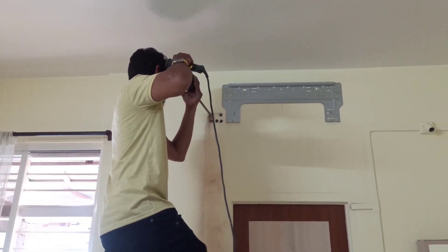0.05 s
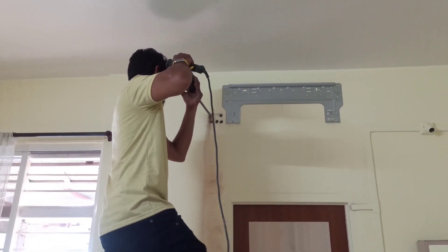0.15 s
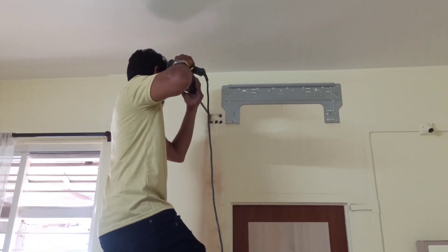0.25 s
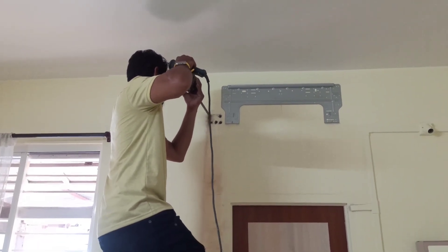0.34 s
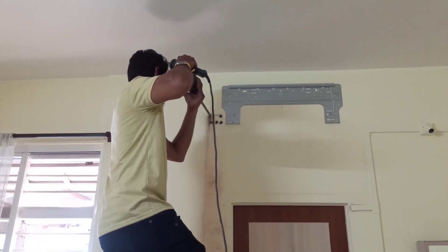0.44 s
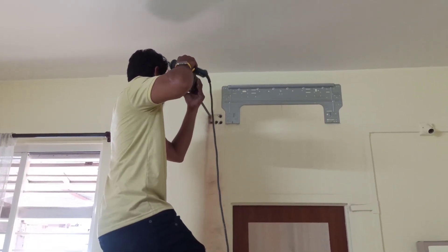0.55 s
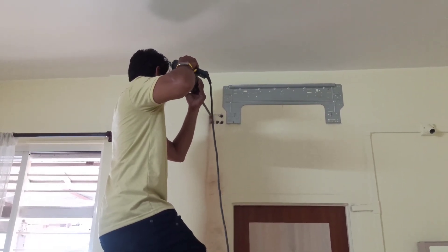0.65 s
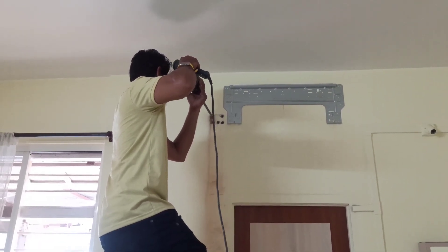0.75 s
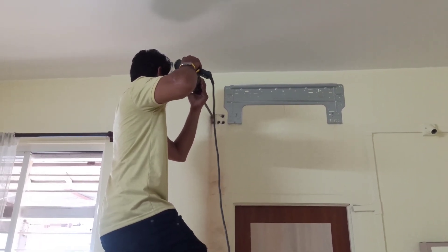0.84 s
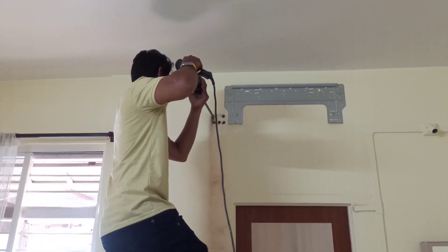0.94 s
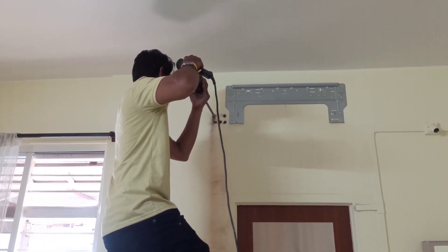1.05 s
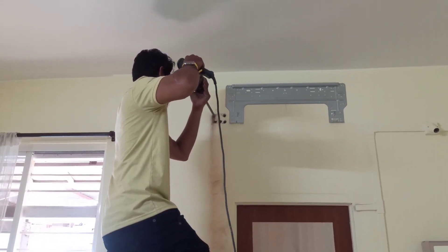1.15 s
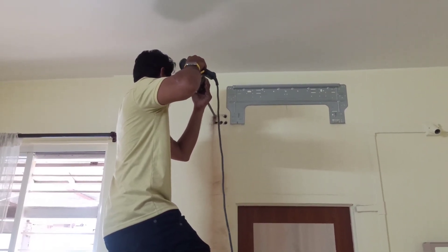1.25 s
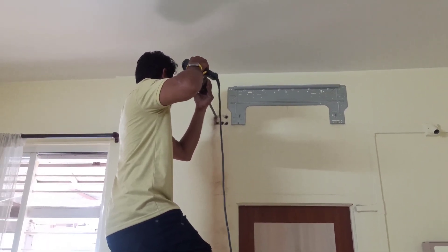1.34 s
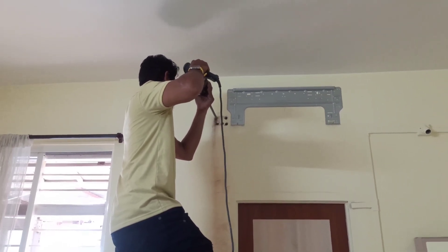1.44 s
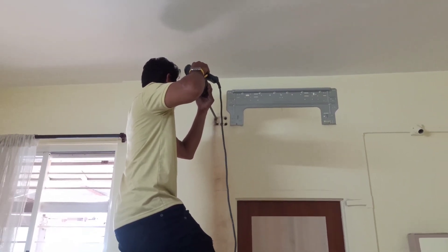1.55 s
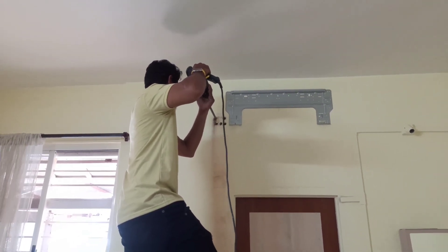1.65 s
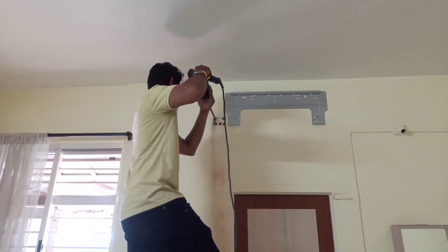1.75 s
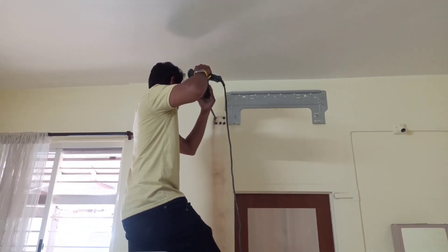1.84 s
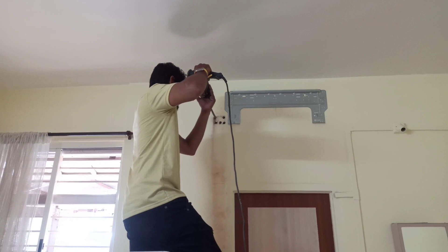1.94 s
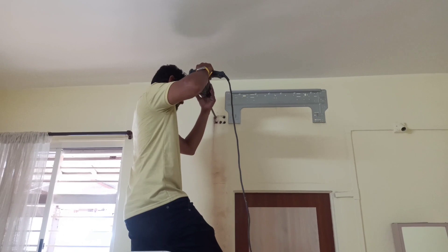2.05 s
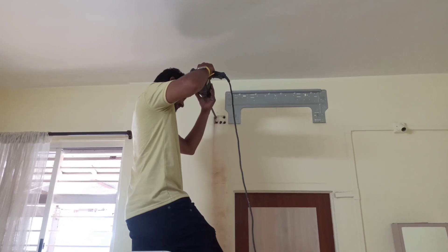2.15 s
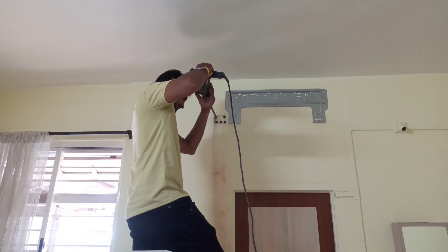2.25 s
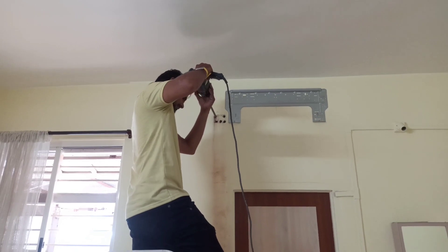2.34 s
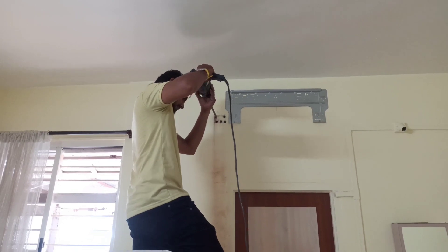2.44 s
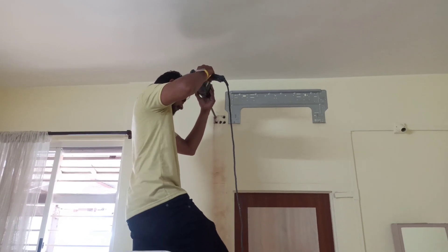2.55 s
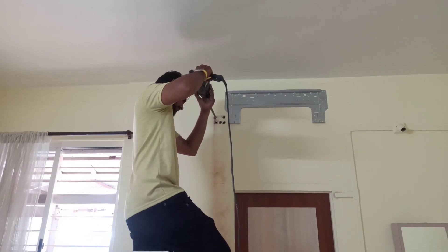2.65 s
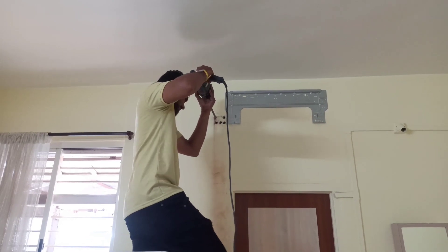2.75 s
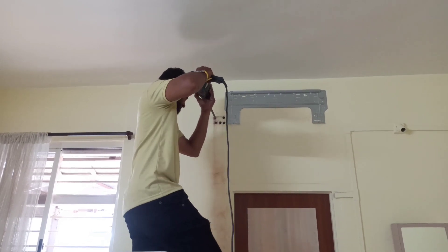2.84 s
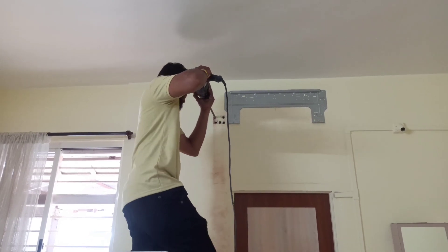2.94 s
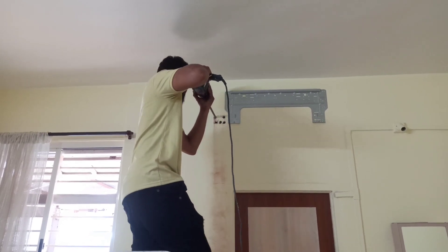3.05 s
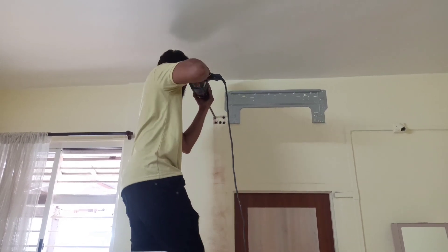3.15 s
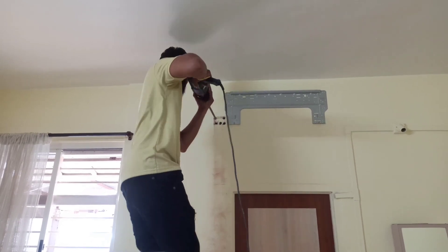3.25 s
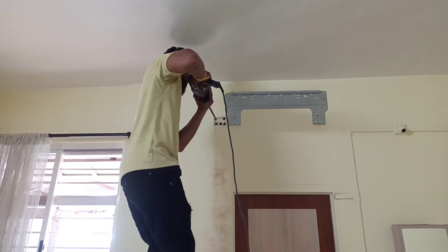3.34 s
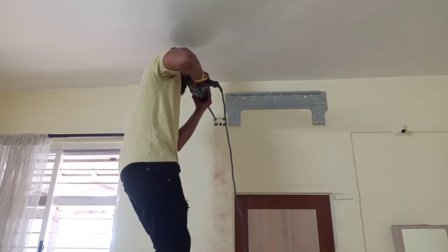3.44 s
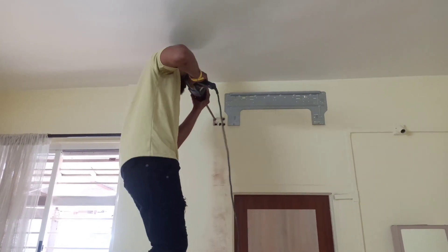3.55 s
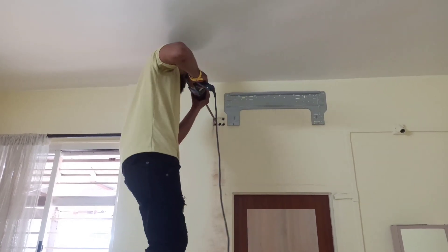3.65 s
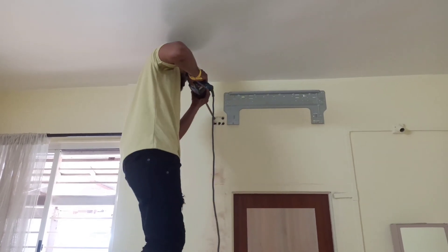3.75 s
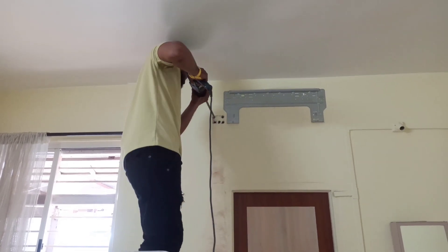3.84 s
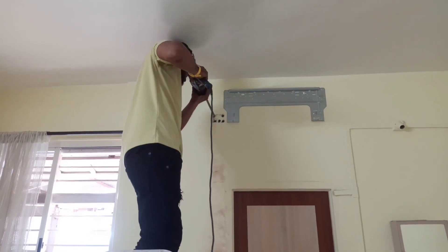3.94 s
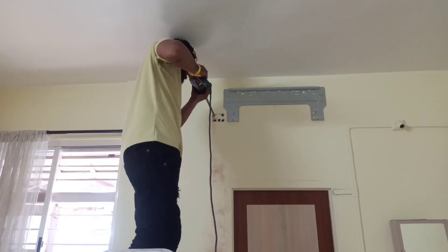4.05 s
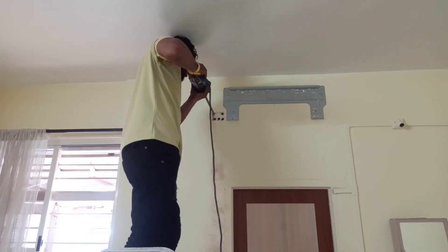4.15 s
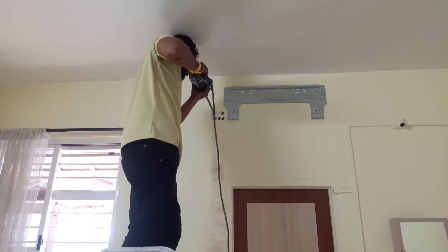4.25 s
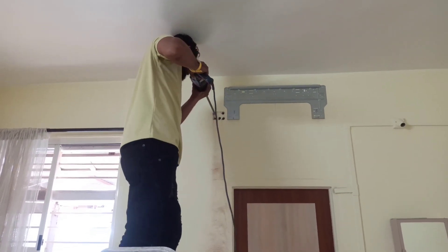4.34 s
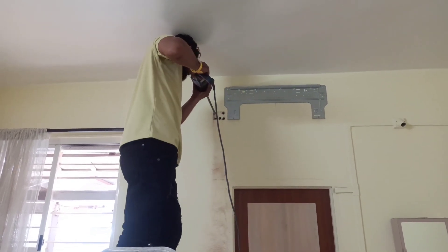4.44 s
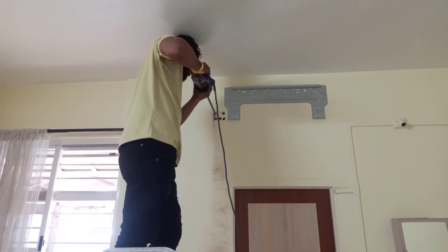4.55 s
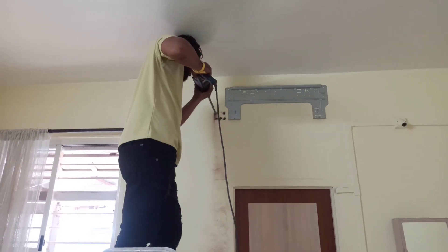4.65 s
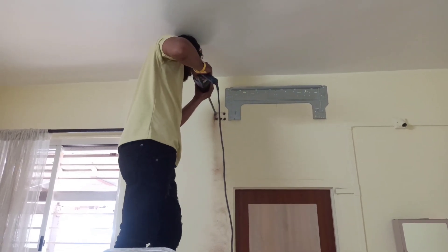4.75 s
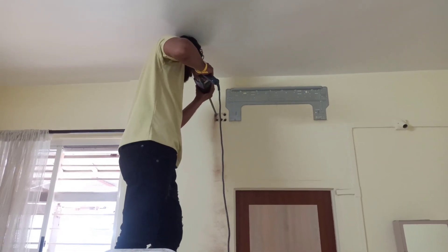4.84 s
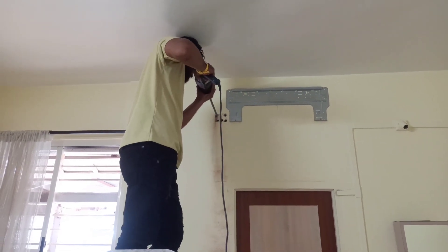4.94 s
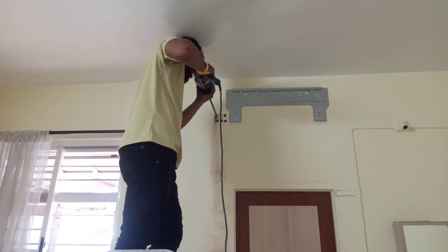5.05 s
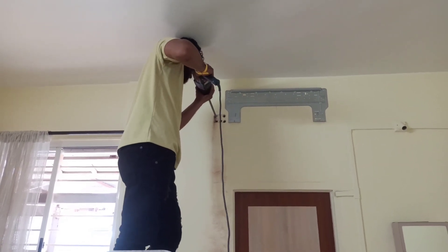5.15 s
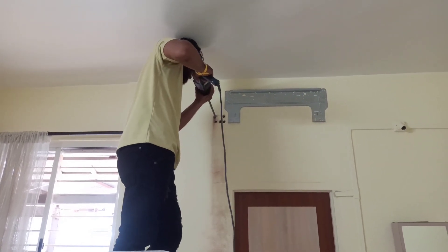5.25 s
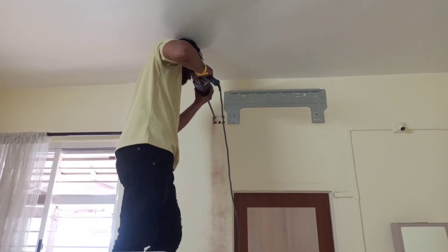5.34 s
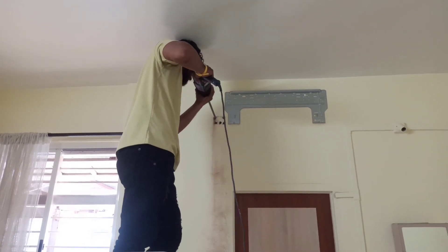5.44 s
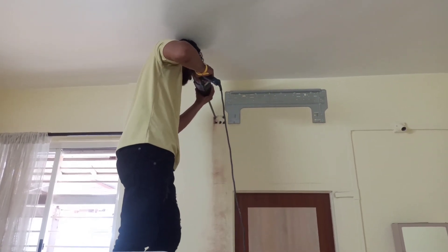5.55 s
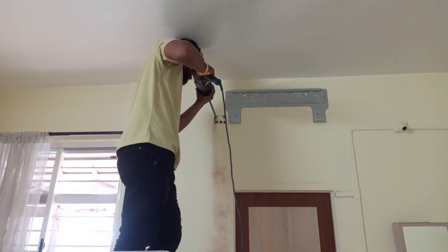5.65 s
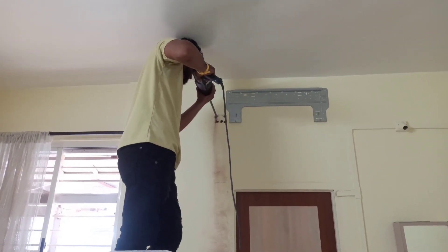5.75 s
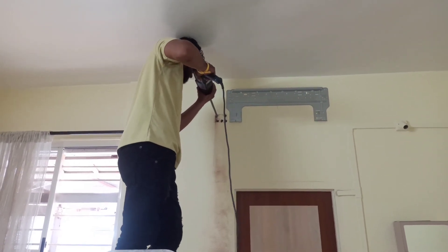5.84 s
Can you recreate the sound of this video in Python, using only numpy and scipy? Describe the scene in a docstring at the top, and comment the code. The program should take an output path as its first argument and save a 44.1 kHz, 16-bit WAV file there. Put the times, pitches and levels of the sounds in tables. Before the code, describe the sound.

An electric hammer drill is already boring loudly into a plastered brick wall, close to the microphone in a bare, echoing room. It makes a harsh, gritty grinding with a rapid buzzing pulse and a faint motor hum underneath. For the first 1.3 seconds the steel bit rings brightly over low thumping, with dull knocks near 0.2 and 0.7 seconds. The grinding then turns duller, with faint squeals as the bit binds. At about 3 seconds the drill cuts out, the loose bit chatters and the echo fades. At 3.3 seconds it restarts with a jolt. Bright ringing and a few more knocks return from 3.6 to 4.2 seconds, followed by duller grinding with thin, high squeals. From about 5.6 seconds the hard metallic hammering comes back, and the drill is still running at the end, just before 6 seconds.

```python
"""A rotary hammer drill grinding into a plastered brick wall: bare room, one small microphone close by.
The cutting edge scrapes through the dust; against hard brick each piston blow also rings the steel
and thumps the wall. Now and then the bit binds and squeals. Behind it, motor hum and faint room hiss.
About 3 s in the trigger is let go: the loose bit chatters, the room dies away, the motor starts again."""
import sys
import numpy as np
from scipy import signal
from scipy.fft import rfft, irfft, next_fast_len
from scipy.io import wavfile
from scipy.ndimage import uniform_filter1d, map_coordinates

SR = 44100
rng = np.random.default_rng(int(sys.argv[2]) if len(sys.argv) > 2 else 0)


def wav_record(signal):
    """Record a signal, one row per channel, as 16-bit PCM in the file named by sys.argv[1]."""
    frames = np.transpose(np.atleast_2d(signal))
    bounded = np.clip(frames, -1, 1)
    # unit amplitude maps onto the largest positive 16-bit level
    quanta = np.round(bounded * 32767).astype(np.int16)
    wavfile.write(sys.argv[1], SR, quanta)


N = 259749

# reverberation of the bare room: f/Hz, time to fall 60 dB/s
ROOM_DECAY = [(100, 0.64), (1000, 0.78), (4000, 1), (12000, 0.67)]
# armature hum at full drive: t/s, level/dB
HUM_LEVEL = [(0, -38), (.7, -46.5), (.95, -42), (1.4, -39), (1.6, -54), (2.05, -41.5), (2.6, -44.5),
             (2.95, -38.5), (3.5, -44), (3.7, -45), (4.5, -51), (4.9, -47), (5.5, -54), (5.7, -42),
             (5.89, -52)]
# the trigger is let go, the motor coasts, then runs again: t/s, level under full drive/dB
MOTOR_DRIVE = [(2.95, -0.5), (3.02, -2.5), (3.05, -6.5), (3.07, -2.5), (3.1, -10), (3.2, -28), (3.28, -45),
               (3.31, -24), (3.35, -0.5)]
# pace of the piston: t/s, blow rate/Hz
PISTON_RATE = [(0, 67.3), (.7, 68), (1.3, 66.8), (3.6, 68), (4.15, 67.2), (5.6, 72), (5.89, 69)]
# how firmly the blows reach the wall: t/s, level/dB
THUMP_LEVEL = [(0, -38), (.15, -40), (.23, -32.5), (.39, -42), (.54, -46), (.6, -34), (1.0, -35.5),
               (1.1, -38), (1.15, -30.5), (1.25, -42), (1.33, -53), (2.03, -49), (2.38, -67), (3.53, -54),
               (3.6, -46), (3.79, -32), (3.92, -40), (4.0, -37.5), (4.08, -33), (4.15, -49), (4.54, -56),
               (5.0, -69), (5.55, -66), (5.63, -35), (5.77, -41.5), (5.89, -51)]
# low end of the shaking wall: f/Hz, relative level/dB
THUMP_SPECTRUM = [(20, -15), (55, -26), (70, -2), (105, 0), (140, -2), (165, -5), (205, 2.5), (260, -4),
                  (350, -1.5), (500, -7), (1200, -21)]
# the hardest blows: t/s, peak level/dB
KNOCKS = [(.245, -24), (.655, -17), (3.755, -25), (3.8, -21), (4.05, -26), (4.091, -27)]
# the trigger closes, then the bit bites: t/s, level/dB
JOLT_LEVEL = [(3.314, -60), (3.319, -31), (3.338, -31), (3.348, -23), (3.385, -22), (3.42, -40)]
# the jolted tool body: f/Hz, width/Hz, relative level/dB
BODY_MODES = [(874, 44, 0), (1320, 78, 1), (1800, 43, -15), (2000, 83, -9), (2570, 54, -2)]
# chatter off the trigger: t/s, level/dB
CHATTER_LEVEL = [(3.045, -54), (3.055, -24.5), (3.095, -23.5), (3.2, -47), (3.3, -68)]
# the bit free in its hole: f/Hz, width/Hz, relative level/dB
LOOSE_BIT_MODES = [(920, 50, -9), (2760, 80, -15), (3330, 30, -8), (3590, 50, 3), (4490, 70, 2),
                   (6250, 70, 0), (6640, 70, -9), (7220, 50, 4), (8160, 60, -8)]
# squeals of the binding bit: start t/s, end t/s, f/Hz, width/Hz, level/dB
BINDS = [(1.305, 1.5, 890, 20, -40), (1.45, 1.8, 2510, 28, -36.5), (1.45, 1.8, 4330, 130, -31),
         (2.148, 2.445, 794, 18, -40), (2.8, 3.053, 744, 26, -35), (4.101, 4.45, 600, 33, -44),
         (4.3, 5.55, 4360, 160, -31), (4.35, 5.89, 1917, 130, -34), (4.852, 5.7, 855, 4, -41),
         (4.947, 5.3, 2565, 50, -37)]
# the brick under the bit: t/s, hardness/0-1
BRICK_HARDNESS = [(0, 0.98), (.36, .94), (.45, .7), (.54, .74), (.64, 0.86), (1.1, 0.85), (1.25, 0.84),
                  (1.33, 0.58), (1.41, 0.04), (2.3, 0.06), (2.72, 0.1), (2.9, 0), (3.36, 0.05), (3.53, 0),
                  (3.59, 0.5), (3.68, 0.93), (3.79, 0.91), (3.97, .77), (4.08, .92), (4.15, 0.77), (4.2, 0),
                  (5.13, 0.25), (5.53, 0.2), (5.6, .75), (5.71, 0.87), (5.81, 0.87), (5.89, 0.35)]
# wall and tool body: f/Hz, width/Hz, relative level/dB
WALL_MODES = [(368.6, 11, -6), (616, 27, -7), (756, 72, -3.5), (846, 18, -1.5), (901, 45, -3),
              (1298, 84, -3), (1895, 205, -1), (2358, 44, 1.5), (2560, 35, -2.5), (3575, 220, -4),
              (4070, 350, -1.5)]
# steel bit and chuck: f/Hz, width/Hz, relative level/dB
STEEL_MODES = [(3920, 130, -7.5), (6160, 360, -4), (7624, 87, 6.5), (9400, 310, 4), (11170, 290, 4.5),
               (13080, 285, 9), (14760, 290, 10)]
# how hard the bit is pushed in: t/s, level added to the grinding/dB
FEED_PUSH = [(0, -1), (.4, 0), (.5, -1), (1.3, -.5), (1.42, 0.5), (1.75, 0), (1.9, 0), (2.4, 1), (2.95, -1),
             (3.36, .5), (3.66, -.5), (3.9, 1), (4.0, -1), (4.15, 0), (4.8, 0), (5.0, -.5), (5.5, .5),
             (5.89, -0.5)]
# brick dust and cutting edge: f/Hz, relative level/dB
GRIT_SPECTRUM = [(40, -37), (120, -23.5), (300, -10), (700, -4), (1500, -5), (3000, -3.5), (4200, 0.5),
                 (7000, -1.5), (16000, -12.5)]
# the small microphone, its treble in shelves; all other levels are ahead of it: f/Hz, gain/dB
MIC_RESPONSE = [(20, 0.5), (4700, 2), (4850, -5.5), (6050, -9), (6170, 1.5), (7600, -1.5), (7700, -5.5),
                (8470, -5), (8570, -19.5), (10400, -22.5), (11530, -29), (11640, -3.5), (12550, -11),
                (12750, -9), (15500, -11.5)]


def amp(db):
    """Decibels to gain."""
    return 10 ** (np.asarray(db) / 20)


def unit(x):
    """Scaled to rms 1."""
    return x / np.sqrt(np.mean(x ** 2) + 1e-20)


def along(points, hz):
    """Rows of f/Hz, value, joined up on a log frequency axis."""
    f, values = np.transpose(points)
    return np.interp(np.log(hz + 1), np.log(f + 1), values)


def curve(rows, outside=None):
    """Rows of t/s, value, joined up to one value a sample."""
    times, values = np.transpose(rows)
    return np.interp(np.arange(N) / SR, times, values, left=outside, right=outside)


def wobble(rate):
    """A smooth random curve, rate knots a second."""
    return map_coordinates(rng.standard_normal(int(N * rate / SR) + 4), [np.arange(N) * rate / SR])


def filtered(x, response):
    """x through a complex frequency response."""
    size = next_fast_len(N + SR // 2)
    return irfft(rfft(x, size) * response(np.fft.rfftfreq(size, 1 / SR)), size)[:N]


def modes(table):
    """Response of a set of resonances, alternating in sign."""
    return lambda f: sum((-1) ** k * amp(db) * 1j * f * width / (hz * hz - f * f + 1j * f * width)
                         for k, (hz, width, db) in enumerate(table))


def patchy_noise(spread_db):
    """White noise with patches of random gain in time and frequency."""
    spectra = signal.stft(rng.standard_normal(N), nperseg=512)[2]
    patches = uniform_filter1d(rng.standard_normal(spectra.shape), 5, axis=0)
    patches = uniform_filter1d(patches, 8, axis=1)
    return signal.istft(spectra * amp(spread_db * unit(patches)), nperseg=512)[1][:N]


def room_hiss(level_db=-61):
    """The steady floor of the room, far behind the tool."""
    return amp(level_db) * rng.standard_normal(N)


def room_echo(x):
    """The bare room answers, each frequency dying at its own speed."""
    hz, t, spectra = signal.stft(rng.standard_normal(SR // 2), SR, nperseg=256)
    decay = amp(-60 * t / along(ROOM_DECAY, hz)[:, None])
    tail = signal.istft(spectra * decay, SR, nperseg=256)[1]
    return signal.fftconvolve(x, tail / np.linalg.norm(tail))[:N]


def motor_hum(shaft_hz=476):
    """The armature hums, one cycle a turn, a little unsteady."""
    turns = np.cumsum(shaft_hz + 4.98 * wobble(4) + 3 * wobble(30)) / SR
    level_db = curve(HUM_LEVEL) + curve(MOTOR_DRIVE) - .5 * wobble(7) + 3 * wobble(25)
    return amp(level_db) * np.sin(2 * np.pi * turns)


def wall_thump(blows, spread_s=.0121):
    """Each blow shakes the wall; its modes up to 400 Hz answer out of step, over spread_s."""
    def response(f):
        lag = np.pi * spread_s * np.minimum(f, 400) ** 2 / 400
        return amp(along(THUMP_SPECTRUM, f)) * np.exp(-1j * lag)
    rumble = amp(-3) * rng.standard_normal(N)  # the wall keeps shaking between blows
    return amp(curve(THUMP_LEVEL)) * unit(filtered(unit(blows) + rumble, response))


def wall_knocks(width_s=.0013):
    """The hardest blows each push the wall once: a short, dull pulse."""
    out = np.zeros(N)
    for at, db in KNOCKS:
        u = (np.arange(N) / SR - at) / width_s
        out -= amp(db) * (1 - u * u) * np.exp(-u * u / 2)
    return out


def restart_jolt():
    """The motor's jerk shakes the tool body over a broad scrape."""
    shake = filtered(rng.standard_normal(N), lambda f: modes(BODY_MODES)(f) + amp(-13.5) * (f > 400))
    return amp(curve(JOLT_LEVEL, outside=-120)) * unit(shake)


def loose_bit():
    """Off the trigger the bit rattles unevenly and its modes sing."""
    rattle = rng.standard_normal(N) * amp(1.5 * wobble(60))
    return amp(curve(CHATTER_LEVEL, outside=-120)) * unit(filtered(rattle, modes(LOOSE_BIT_MODES)))


def squeals():
    """As the bit binds, a narrow resonance swells and fades."""
    t, out = np.arange(N) / SR, np.zeros(N)
    for start, end, hz, width, db in BINDS:
        swell = np.sin(np.pi * np.clip((t - start) / (end - start), 0, 1)) ** .5
        band = unit(filtered(rng.standard_normal(N), modes([(hz, width, 0)])))
        out += amp(db) * swell * band
    return out


def piston(scatter_db=2):
    """One impulse per piston stroke, each of its own strength."""
    rate_hz = curve(PISTON_RATE) + 1.513 * wobble(30)
    strokes = np.floor(np.cumsum(rate_hz) / SR).astype(int)
    strengths = amp(scatter_db * rng.standard_normal(N // 400))
    return np.diff(strokes, prepend=0) * strengths[strokes]


def bit_force(blows, decay_s, push):
    """A steady push plus a burst dying after each blow."""
    burst = signal.lfilter([1], [1, -np.exp(-1 / (decay_s * SR))], blows)
    return unit(push + unit(burst))


def brick_level(soft_db, hard_db):
    """A level that follows the hardness of the brick under the bit."""
    return soft_db + (hard_db - soft_db) * curve(BRICK_HARDNESS)


def wall_ring():
    """Wall and tool body resonate, most in soft brick."""
    level_db = brick_level(soft_db=-27.5, hard_db=-31.5) + 1.4 * wobble(14)
    return amp(level_db) * unit(filtered(patchy_noise(spread_db=1.5), modes(WALL_MODES)))


def steel_ring(blows):
    """Blows ring bit and chuck, most in hard brick; much of it lies where the microphone is dull."""
    level_db = brick_level(soft_db=-31, hard_db=-10) + .45 * wobble(8)
    force = bit_force(blows, decay_s=.0052, push=2.1) * amp(.72 * wobble(9.6))
    strike = patchy_noise(spread_db=2) * force
    return amp(level_db) * unit(filtered(strike, modes(STEEL_MODES)))


def grinding(blows):
    """The cutting edge crumbles brick: broad noise pulsing with the piston."""
    level_db = brick_level(soft_db=-19.5, hard_db=-20) + curve(FEED_PUSH) + .3 * wobble(12)
    force = bit_force(blows, decay_s=.0097, push=3.6) * amp(.32 * wobble(25))
    crumble = patchy_noise(spread_db=1) * force
    return amp(level_db) * unit(filtered(crumble, lambda f: amp(along(GRIT_SPECTRUM, f))))


def scene():
    """The drill up close, the room behind it, alike in both channels."""
    blows = piston()
    drilling = amp(curve(MOTOR_DRIVE)) * (wall_ring() + steel_ring(blows) + grinding(blows))
    tool = restart_jolt() + loose_bit() + squeals() + drilling
    thump = wall_thump(blows)
    echo = room_echo(amp(-8.5) * tool + amp(-4) * thump)
    mono = room_hiss() + echo + motor_hum() + thump + wall_knocks() + tool
    return np.array([mono, mono])


def record(dry):
    """The small microphone colours the treble, rounds the peaks softly and cuts off the very top."""
    ceiling, top_hz = .55, 15500
    coloured = np.array([filtered(x, lambda f: amp(along(MIC_RESPONSE, f))) for x in dry])
    rounded = coloured / (1 + np.abs(coloured / ceiling) ** 4) ** (1 / 4)
    return np.array([filtered(x, lambda f: amp(-.4 * np.clip(f - top_hz + 40, 0, 400))) for x in rounded])


dry = scene()
out = record(dry)
wav_record(out)
```